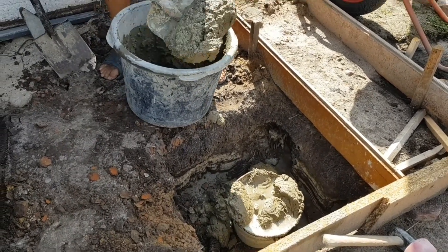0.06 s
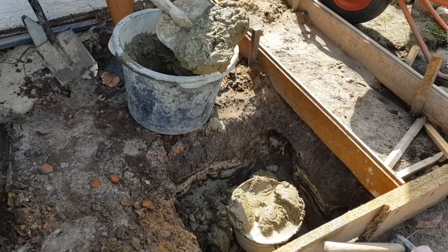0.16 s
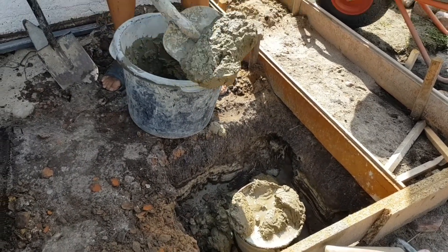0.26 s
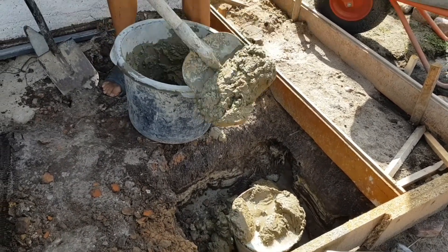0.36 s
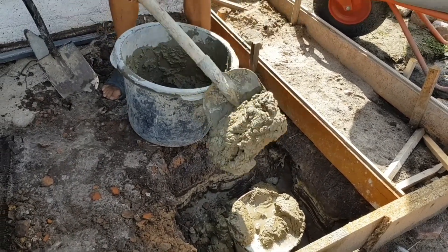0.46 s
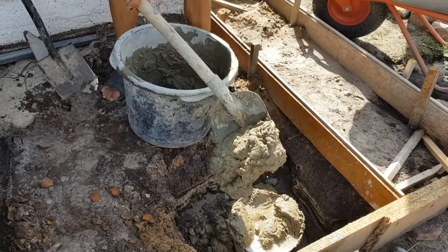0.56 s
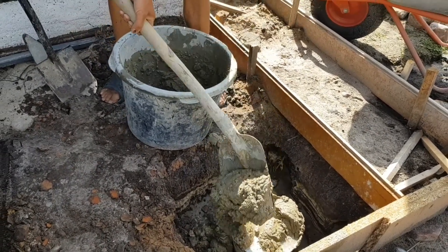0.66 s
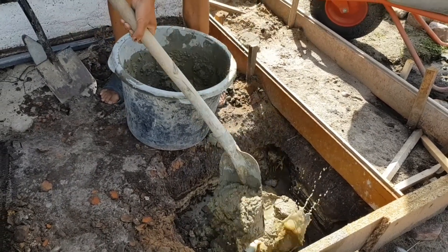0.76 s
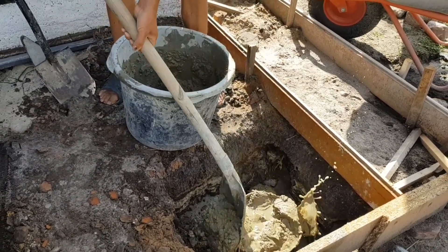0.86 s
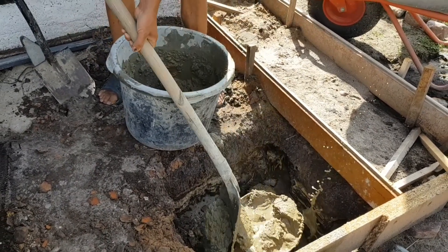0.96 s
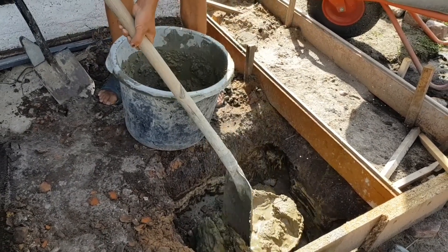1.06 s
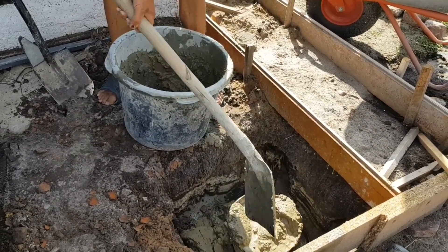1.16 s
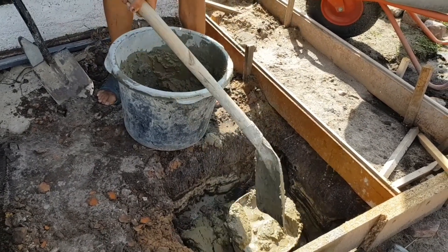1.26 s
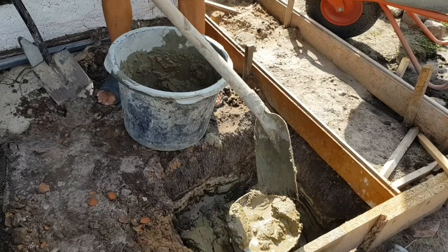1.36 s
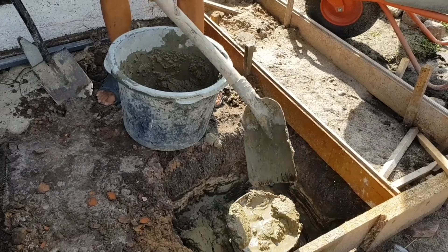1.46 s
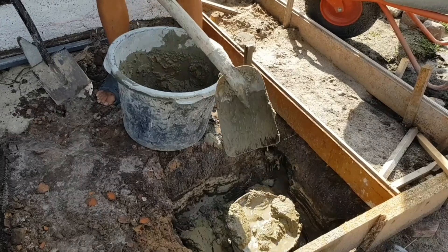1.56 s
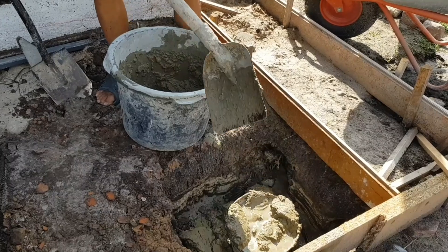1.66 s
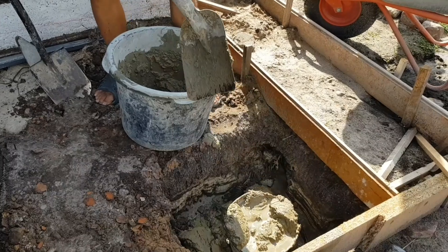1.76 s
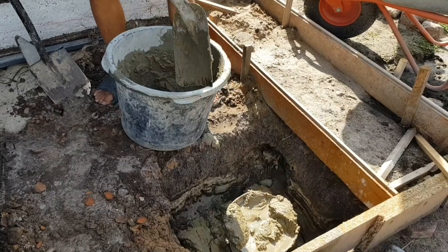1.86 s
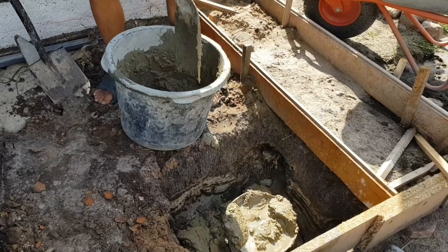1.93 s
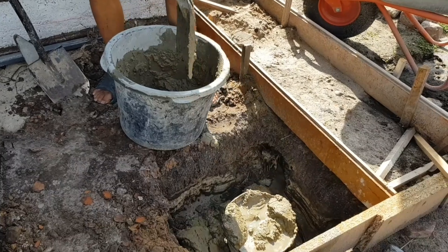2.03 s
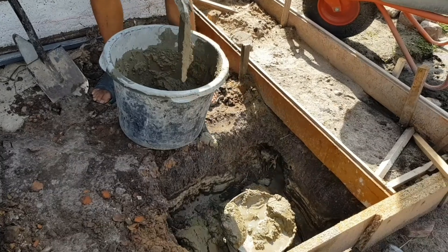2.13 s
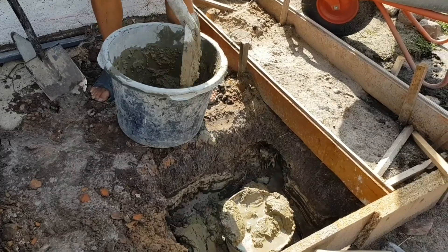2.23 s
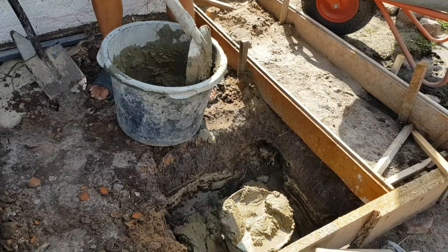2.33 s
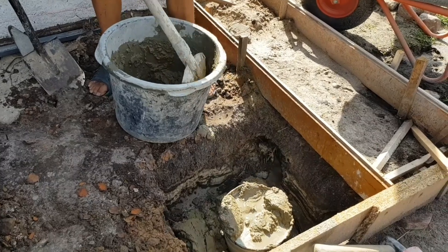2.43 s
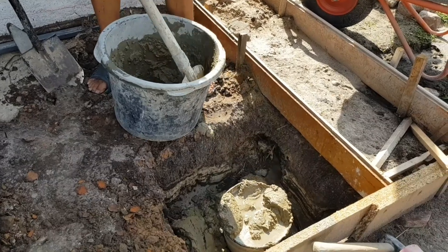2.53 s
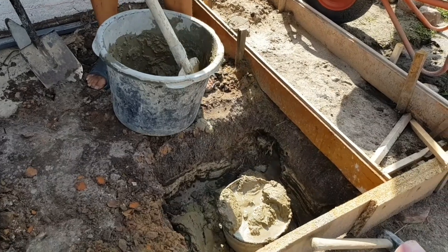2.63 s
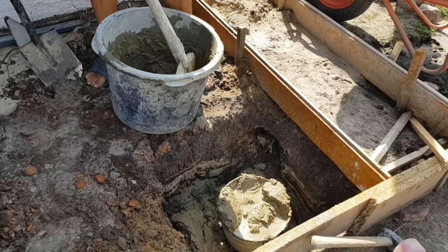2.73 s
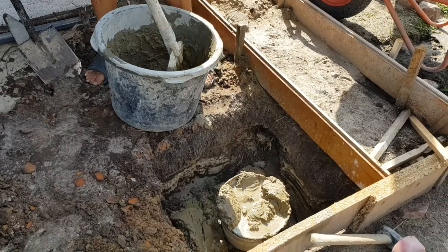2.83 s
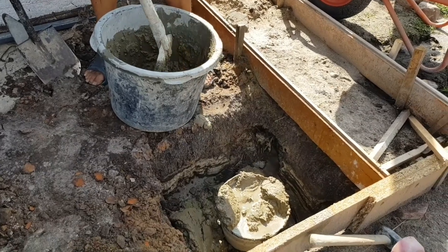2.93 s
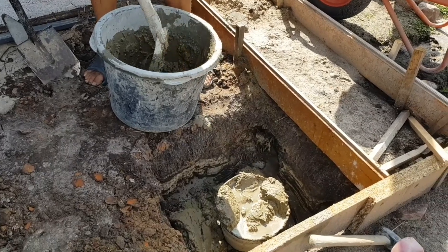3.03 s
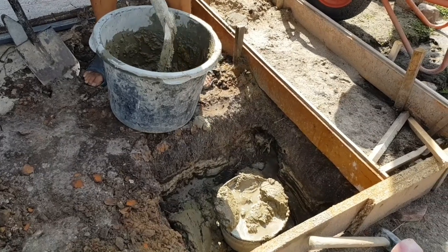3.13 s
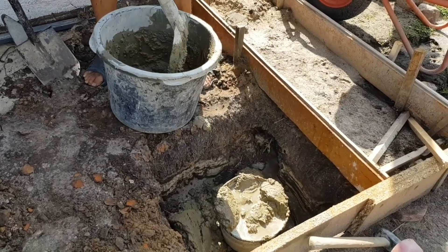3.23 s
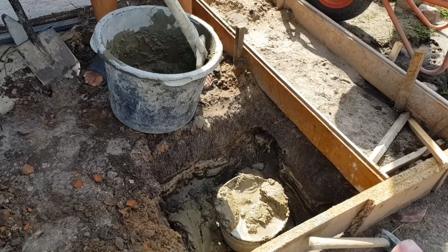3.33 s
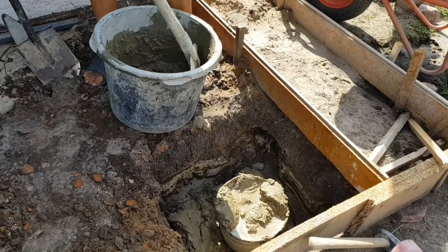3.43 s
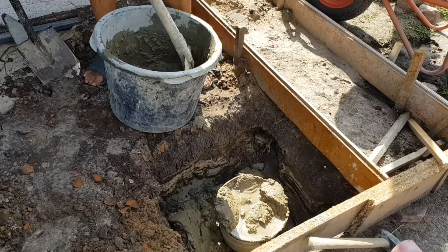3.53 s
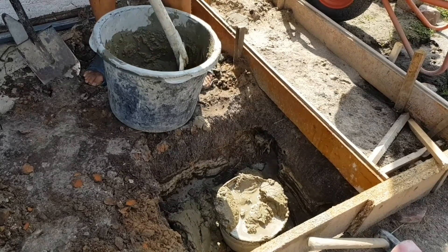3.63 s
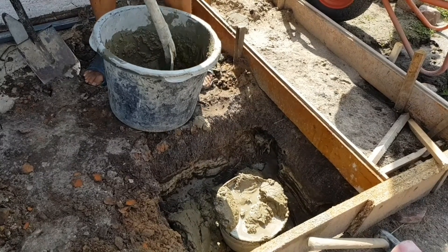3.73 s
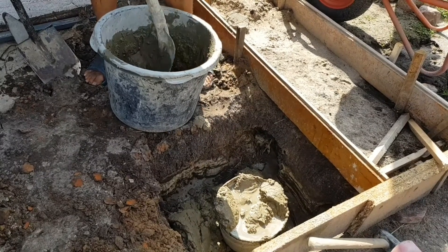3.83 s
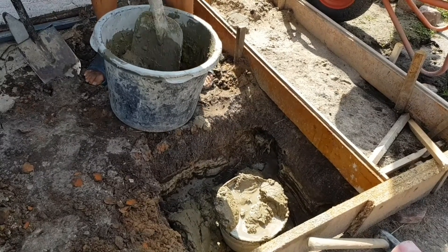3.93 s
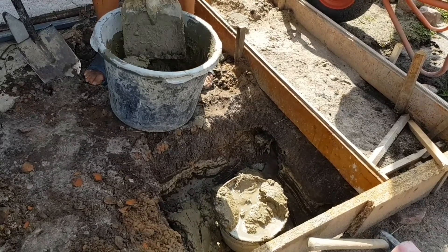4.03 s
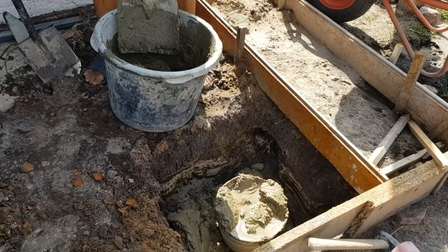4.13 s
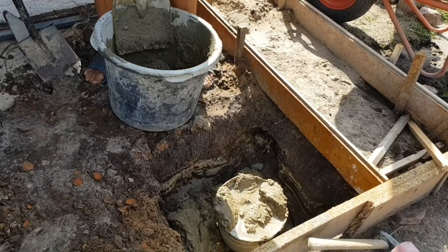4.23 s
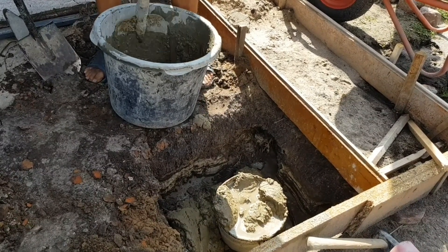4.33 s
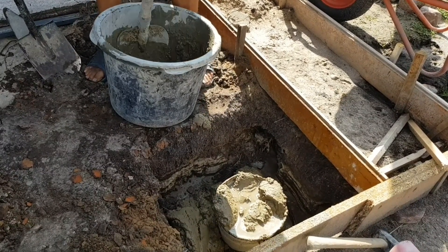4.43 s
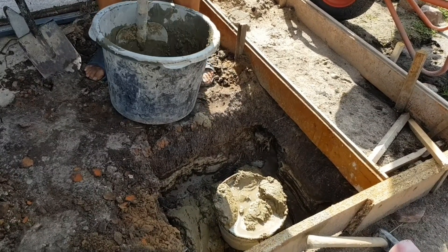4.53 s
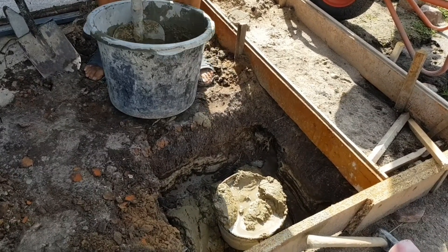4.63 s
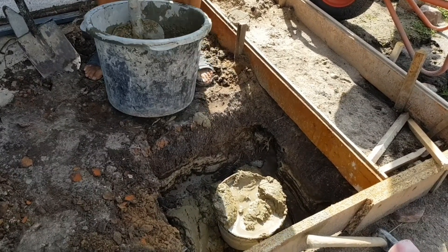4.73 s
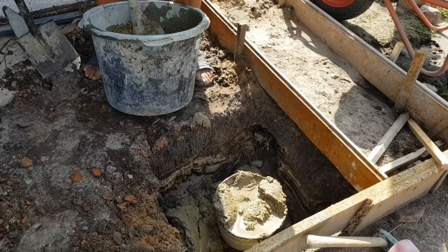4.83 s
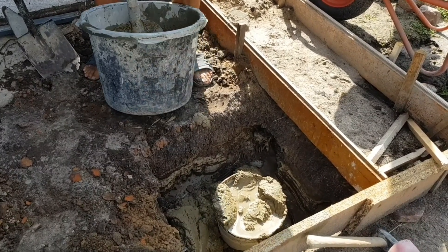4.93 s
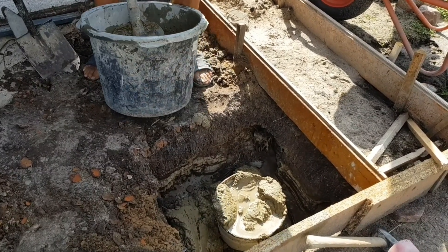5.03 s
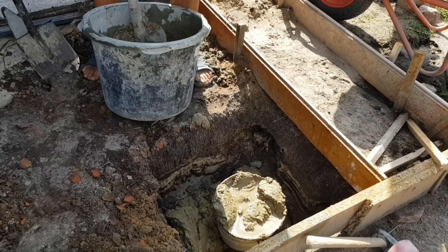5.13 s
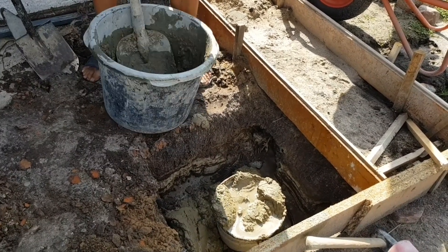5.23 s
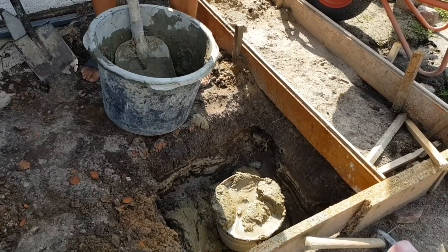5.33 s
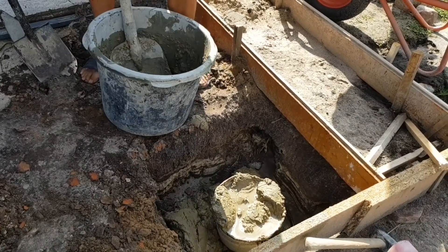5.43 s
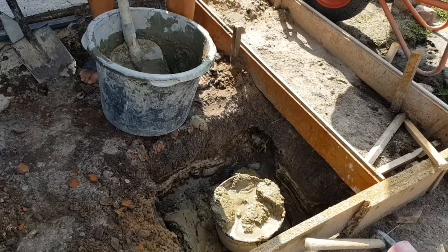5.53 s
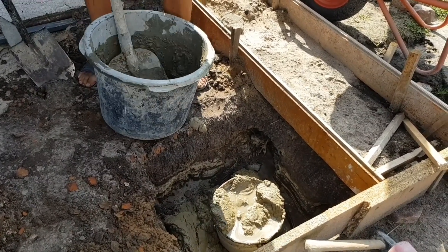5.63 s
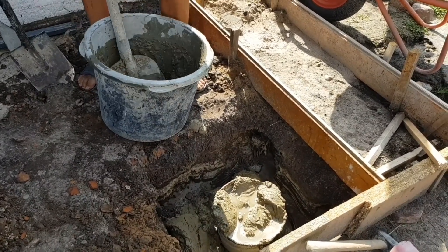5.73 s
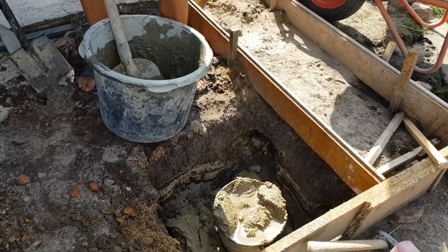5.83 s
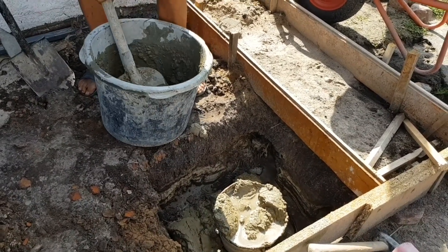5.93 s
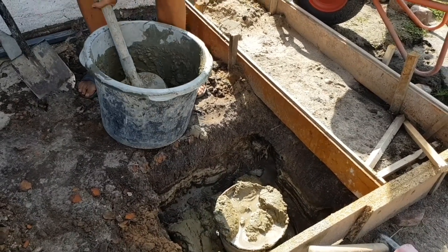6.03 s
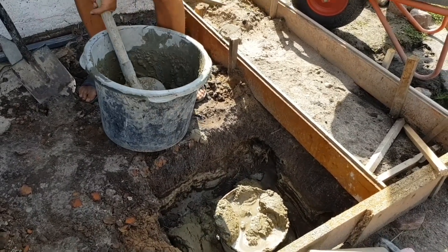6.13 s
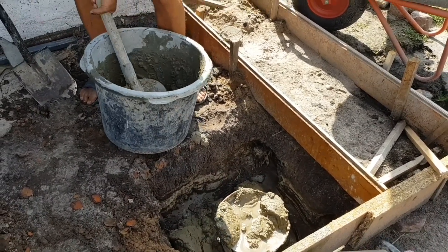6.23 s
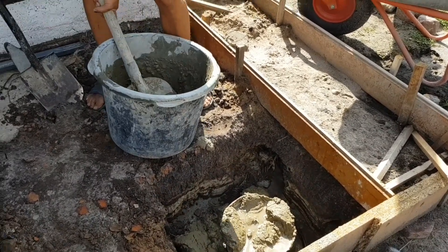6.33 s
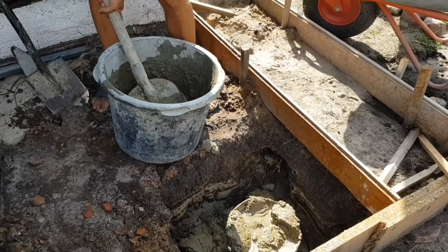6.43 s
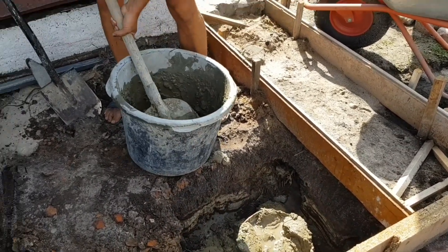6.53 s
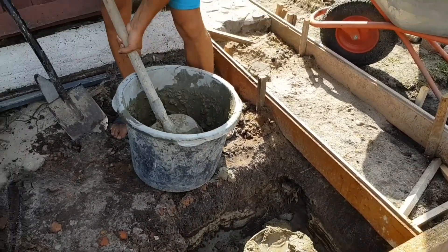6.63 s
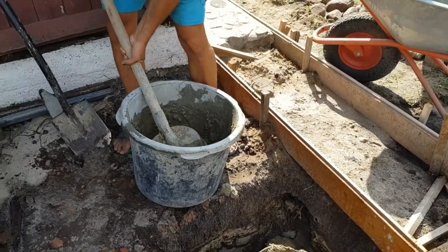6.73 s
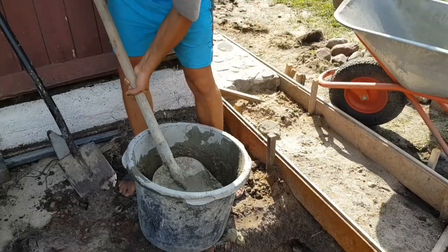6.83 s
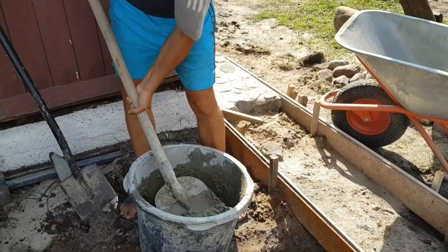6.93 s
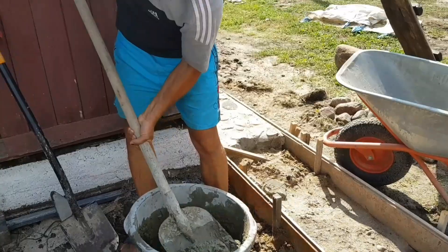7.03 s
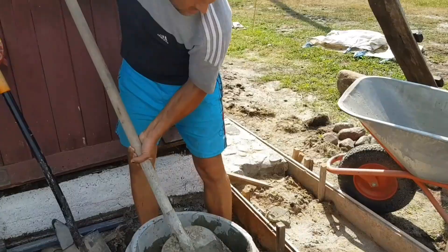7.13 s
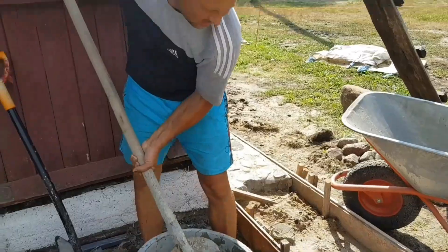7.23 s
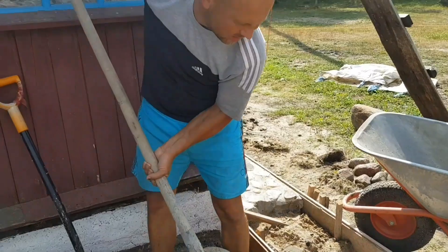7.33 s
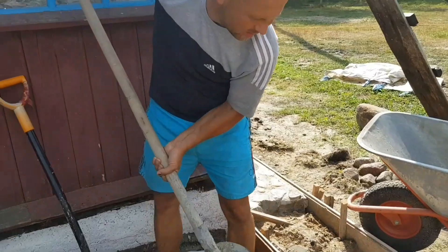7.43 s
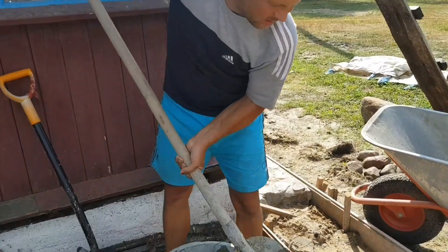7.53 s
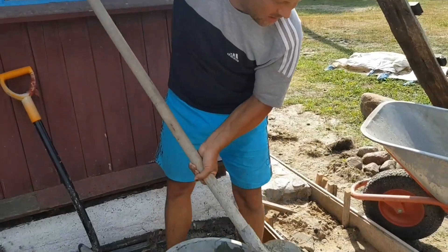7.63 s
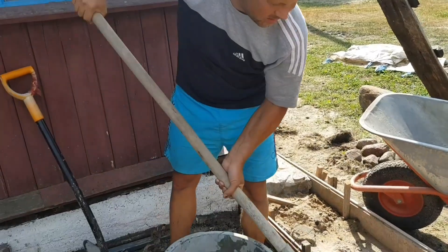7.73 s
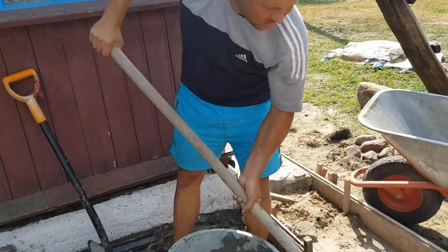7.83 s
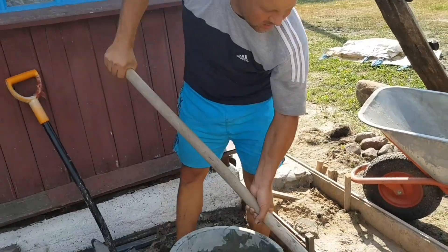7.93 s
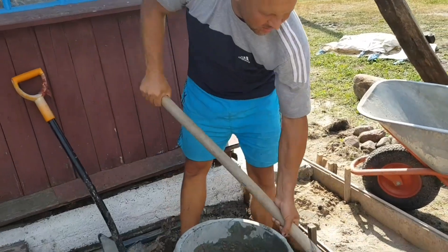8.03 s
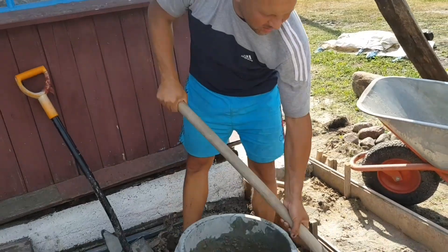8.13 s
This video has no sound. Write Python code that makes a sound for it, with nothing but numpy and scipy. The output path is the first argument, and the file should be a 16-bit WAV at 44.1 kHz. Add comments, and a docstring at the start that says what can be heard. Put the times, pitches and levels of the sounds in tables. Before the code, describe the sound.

Wet concrete slaps down off a shovel, then the blade knocks and scrapes gritty mix in a plastic tub outdoors.

```python
"""Wet concrete crackles and slides on a steel shovel in a yard; then the load slaps into a footing hole.
The blade knocks on a plastic tub and scrapes gritty mortar along its wall, stroke after stroke: impacts
and stick-slip friction excite the modes of steel and plastic. In between, films of cement water burst
softly in the mix. Behind it all lies a distant hush, and a light breeze buffets the microphone."""
import sys
import numpy as np
from scipy import signal
from scipy.fft import rfft, irfft, next_fast_len
from scipy.io import wavfile

SR = 44100
rng = np.random.default_rng(int(sys.argv[2]) if len(sys.argv) > 2 else 0)


def dump(signal):
    """Clip the signal to [-1, 1] and save it as 16-bit WAV at the path in sys.argv[1]."""
    limited = np.clip(np.atleast_2d(signal).T, -1, 1)
    pcm = np.round(limited * 32767).astype(np.int16)
    wavfile.write(sys.argv[1], SR, pcm)


N = 361179

# Spectra of the noises. Each row: frequency in Hz, relative spectral density in dB.
HUSH_SPECTRUM = [(30, -13), (100, -1), (200, -1), (360, 5), (480, -0.5), (700, -10), (1200, -13),
                 (2300, -14.5), (5000, -16), (9000, -19), (14500, -20)]  # distant outdoor sound
GUST_SPECTRUM = [(15, 0.5), (30, -21.5), (52, -0.5), (80, -1), (115, -8), (170, -20.5), (300, -25),
                 (900, -64)]  # wind on the microphone
CRACKLE_SPECTRUM = [(400, -18.5), (1000, -7), (2500, 5), (4200, 3), (5500, 2), (7200, 3.5), (8800, -1),
                    (14500, 1)]  # bursting films of water
SLIDE_SPECTRUM = [(600, -14), (900, -3.5), (1400, -2.5), (1900, 4), (2450, 2), (3100, -2), (4000, 0),
                  (9000, -15)]  # mix sliding on steel
GRAVEL_SPECTRUM = [(150, -45), (350, -4), (520, -5.5), (900, 3), (1300, -11), (1900, -2), (2700, -10),
                   (3300, -22), (6000, -25), (15000, -24.5)]  # grinding gravel
SAND_SPECTRUM = [(500, -16.5), (1500, -3), (2800, 2.5), (3500, 0), (5200, -1.5), (7300, -1.5), (8300, -4),
                 (14500, -3.5)]  # rasping sand

# Normal modes. Each row: frequency in Hz, relative level in dB, time to decay by 60 dB in seconds.
BASE_MODES = [(120, -0.5, 0.12), (195, -5, 0.079)]  # base of the tub
WALL_MODES = [(216, -2.5, 0.074), (241, -3, 0.059), (250, -5, 0.089), (297, -12, 0.057),
              (372.5, -9.5, 0.066), (442, -10.5, 0.056), (480, -8, 0.06), (512, -10.5, 0.065),
              (614, -15, 0.054)]  # plastic wall of the tub
BLADE_MODES = [(619, -4, .05), (840, -5, .04), (892, -3, .09), (1178, 0, .11), (1271, 0, .08),
               (1487, -2, .04), (1577, -1, .1), (1834, 0, .07), (1879, -1, .06), (2047, -4, .05),
               (2246, -4, .06), (2481, -1, .13), (2614, -4, .06), (2793, -4, .05), (3262, -8, .1),
               (4837, -10, .13), (6331, -11, .13), (6728, -12, .12)]  # steel blade damped by mortar

# Course of the distant hush. Each row: time in seconds, relative level in dB.
HUSH_LEVELS = [(0, -60.5), (0.2, -59.5), (0.44, -62), (0.7, -58), (1.35, -61.5), (1.8, -58.5), (2.3, -61),
               (2.75, -57.5), (3.301, -60), (4.15, -59), (5.05, -60.5), (5.7, -57.5), (6.25, -60),
               (6.9, -57.5), (7.45, -66.5), (7.8, -58), (8.19, -63.5)]
# Puffs of breeze. Each row: start and length in seconds, relative level in dB.
BREEZE_PUFFS = [(0.13, 0.079, -42.5), (0.28, 0.028, -49), (0.52, 0.31, -48.5), (1.023, 0.11, -48),
                (2.113, 0.13, -56), (2.39, 0.2, -48), (2.903, 0.25, -44), (3.245, 0.33, -45.5),
                (3.693, 0.45, -48.5), (4.243, .28, -45.5), (4.903, .06, -44.5), (5.28, 0.093, -50.5),
                (6.414, .05, -56), (6.936, 0.068, -40), (7.329, 0.035, -51), (7.724, 0.11, -44),
                (7.94, .06, -43)]
# The wet mix shifts. Each row: start and length in seconds, swell over the shift in dB,
# relative levels of crackle and of sliding in dB.
MIX_SHIFTS = [(0.0, 0.041, 6.5, -62.5, -48.5), (0.29, .012, 5, -61.5, -58), (0.532, 0.33, 0, -53, -54),
              (0.80, 0.17, -2.5, -53.5, -47), (1.048, 0.1, 4.5, -49.5, -45), (1.23, .025, 2, -59, -60),
              (1.43, 0.091, 4, -55.5, -73), (2.676, .12, -5, -69, -55.5), (2.889, .19, 6, -56, -53),
              (3.608, 0.17, -2, -58, -53), (3.895, 0.026, 0, -56.5, -55.5), (3.982, 0.28, -3, -66, -75),
              (4.53, .03, 0, -57, -66), (4.62, .34, 2.5, -59.5, -56.5), (5.38, .09, -2, -58, -70),
              (6.332, 0.28, 13, -60, -58), (6.843, 0.22, 2, -60.5, -59), (7.17, 0.053, -3, -58.5, -61),
              (7.296, 0.094, 1, -60.5, -78), (7.545, 0.017, 0.5, -56.5, -68), (7.772, 0.36, 4.5, -57, -75)]
# Pebbles skid on steel. Each row: start in seconds, level in dB, pitch in Hz, length in seconds.
PEBBLE_SKIDS = [(0.0, -52.5, 2520, 0.067), (0.779, -42, 2600, 0.017), (1.023, -54, 1900, 0.027),
                (1.063, -43, 1960, 0.019), (3.498, -30.5, 2400, 0.024), (6.915, -60, 2400, .17),
                (6.97, -56.5, 860, .08), (7.15, -55, 2530, .065), (7.535, -51.5, 2730, 0.039),
                (7.729, -59.5, 2500, .17), (7.84, -57.5, 2820, 0.16)]
# The loaded tub bumps on the soil. Each row: start in seconds, impulse level in dB.
TUB_BUMPS = [(3.173, -37), (3.53, -34), (5.664, -43), (6.040, -41), (6.585, -24.5), (6.593, -26),
             (6.934, -34.5)]
# Lumps and pebbles land. Each row: start in seconds, slap level in dB, pitch in Hz, crack level in dB.
LUMP_LANDINGS = [(0.7794, -33.5, 1860, -27.5), (0.783, -39, 196, -45), (0.795, -44, 1670, -40),
                 (0.836, -44.5, 1390, -46), (0.892, -39, 1280, -36), (0.901, -32, 410, -27.5),
                 (0.904, -39.5, 1410, -49), (1.106, -41.5, 950, -33.5), (1.121, -34.5, 530, -36.5),
                 (1.148, -34, 495, -46)]
# Blade and stones strike the tub. Each row: start in seconds, clack level in dB, pitch in Hz,
# crack level in dB, relative level of the wall's thump in dB.
BLADE_KNOCKS = [(1.9263, -32, 786, -35, -32.5), (2.403, -39, 1800, -42, -53), (2.4240, -13, 1580, -34, -31),
                (2.4262, -13, 1300, -37, -46), (2.433, -25, 230, -44, -20.5), (2.488, -24, 1410, -27, -30),
                (2.547, -23.5, 1500, -47, -30), (2.586, -46, 377, -53, -28.5),
                (3.168, -42, 457, -40, -38.5), (3.505, -33, 1400, -37, -52), (3.528, -23.5, 470, -37, -27),
                (4.13, -53, 300, -60, -44), (4.2644, -38.5, 470, -56, -37), (4.330, -31, 850, -36, -26),
                (4.395, -29, 1000, -22.5, -30), (4.446, -21, 1210, -37, -36), (4.473, -48, 350, -35, -28.5),
                (5.255, -33.5, 533, -45, -48), (5.481, -38.5, 1080, -49, -50), (5.612, -42, 1270, -53, -45),
                (6.040, -36.5, 390, -59, -36), (6.4123, -42, 640, -48, -46), (6.580, -22.5, 450, -55, -30),
                (6.592, -44, 400, -58, -25), (6.785, -46.5, 810, -55, -66)]
# The blade is pushed along the tub. Each row: start and length in seconds, swell over the stroke in dB,
# relative levels of grinding, of drag on the wall and of sand rasp in dB.
BLADE_STROKES = [(1.935, 0.0049, -11, -40, -41.5, -48.5), (2.419, .16, -1, -32.5, -37.5, -34),
                 (3.411, 0.049, 1, -38, -40.5, -37.5), (3.512, 0.016, -4.5, -36.5, -47, -39),
                 (4.275, 0.031, 6.5, -35.5, -39.5, -40.5), (4.327, 0.13, 4.5, -27.5, -43, -31),
                 (4.814, 0.037, 3, -48.5, -53, -62), (5.16, 0.12, 4.5, -41.5, -51, -47.5),
                 (5.27, 0.056, -2, -32.5, -36, -39), (5.341, 0.044, -6, -38.5, -40, -49),
                 (5.484, 0.032, -0.5, -51.5, -47.5, -56), (5.616, .02, 3, -40, -41.5, -50.5),
                 (5.662, 0.17, -10, -49.5, -45.5, -56), (5.859, 0.2, 11.5, -45, -44, -53.5),
                 (6.16, .015, -3, -60, -56, -65), (6.416, 0.034, -4, -54.5, -55, -59),
                 (6.588, 0.06, -4, -46, -39, -56), (6.772, 0.019, 0.5, -46.5, -44, -50.5),
                 (6.943, .08, -1, -61, -53.5, -59), (7.190, .02, -6, -57.5, -71, -59),
                 (8.186, .05, 1, -50, -70, -48.5)]


def from_db(db):
    """Amplitude grows tenfold for every 20 dB."""
    return np.exp(np.asarray(db) * (np.log(10) / 20))


def rms_one(x):
    """Division by the root mean square gives a signal unit power."""
    return x / np.sqrt(np.mean(x ** 2) + 1e-20)


def add(out, start, sound):
    """Superposition: a short sound adds to the mix from its start in seconds."""
    part = out[..., int(start * SR):][..., :sound.shape[-1]]
    part += sound[..., :part.shape[-1]]


def cut(x, hz, kind, order=2):
    """A Butterworth low- or high-pass slopes by 6 dB per octave for each order."""
    return signal.sosfilt(signal.butter(order, min(hz, SR / 2.2), kind, fs=SR, output="sos"), x + 1e-18)


def drift(hz):
    """Low-passed noise wanders at random with unit power, faster for a higher corner frequency."""
    pole = np.exp(-80 * np.pi * hz / SR)  # one step per 40 samples
    slow = signal.lfilter([1], [1, -2 * pole, pole * pole], rng.standard_normal(N // 40 + 2002))[2000:]
    return np.interp(np.arange(N) / 40, np.arange(len(slow)), rms_one(slow))


def coloured(x, spectrum):
    """A minimum-phase filter imposes a spectrum causally; the result has unit power."""
    size = 2 * next_fast_len(N // 2 + SR // 10)
    hz, db = np.transpose(spectrum)
    shape_db = np.interp(np.log(np.arange(size // 2 + 1) * SR / size + 1), np.log(hz), db)
    cepstrum = irfft(np.log(from_db(shape_db)))[:size // 2]
    response = np.exp(rfft(2 * cepstrum, size))
    return rms_one(irfft(rfft(x, size) * response)[..., :N])


def swells(start, length, level_db, swell_db, rise, fall):
    """Envelopes rise and fall exponentially (dB/s), ramping by swell_db between; the loudest prevails."""
    t = np.arange(0, N + 40, 40) / SR
    since, length = t[:, None] - start, np.maximum(length, 1e-3)
    held_db = level_db + swell_db * (np.clip(since / length, 0, 1) - .5)
    db = held_db + rise * np.minimum(since, 0) - fall * np.maximum(since - length, 0)
    return np.interp(np.arange(N) / SR, t, from_db(db.max(axis=1)))


def ring(force, modes):
    """Modal superposition: a force drives damped resonators, which sum with alternating signs."""
    out = 0
    for k, (hz, db, t60) in enumerate(modes):
        radius, angle = from_db(-60 / (t60 * SR)), 2 * np.pi * hz / SR
        feedback = [1, -2 * radius * np.cos(angle), radius * radius]
        out = out + (-1) ** k * from_db(db) * signal.lfilter([0, np.sin(angle)], feedback, force + 1e-18)
    return out


def rubbed(force, modes, wander_db):
    """Coupling to each mode varies as the contact point travels; the result has unit power."""
    return rms_one(sum((-1) ** k * ring(force * from_db(wander_db * drift(hz=10.2)), [mode])
                       for k, mode in enumerate(modes)))


def grains(per_s, spread_db, size=N):
    """Shot noise: many small clicks and a few large; the channels share lows but differ in the treble."""
    born = rng.random((3, size)) < per_s / SR
    clicks, count = np.zeros((3, size)), born.sum()
    signs = rng.choice([-1, 1], count)
    clicks[born] = signs * from_db(spread_db * np.minimum(rng.exponential(1, count), 4))
    shared = cut(clicks[0], 930, "low", order=1)
    return rms_one(shared + cut(clicks[1:], 2040, "high", order=1))


def burst(source, t60, rise):
    """A transient builds with time constant rise, then decays exponentially, 60 dB in t60 seconds."""
    t = np.arange(source.shape[-1]) / SR
    return rms_one(source) * (1 - np.exp(-t / rise)) * from_db(-60 * t / t60)


def impact(level_db, hz, octaves, t60, crack_db):
    """A granular impact is a rattle of contacts in one band, topped by a crack and a spray of grit."""
    contacts, grit = (grains(per_s=11000, spread_db=3.5, size=SR // 4) for _ in range(2))
    low_hz, high_hz = hz / 2 ** (octaves / 2), hz * 2 ** (octaves / 2)
    band = cut(cut(contacts, high_hz, "low", order=4), low_hz, "high", order=3)
    body = burst(band, t60, rise=0.00028)
    grit = cut(cut(grit, 1500, "high"), 8800, "low", order=1)
    crack = burst(grit, t60=0.015, rise=0.00094)
    spray = from_db(-2.5) * burst(grit, t60=0.085, rise=0.0039)
    return from_db(level_db) * body + from_db(crack_db) * (crack + spray)


def air():
    """Turbulent pressure rumbles on the microphone over a distant hush, decorrelated in the treble."""
    shared, apart = rng.standard_normal((2, N)), rng.standard_normal((2, 2, N))
    hush = coloured(shared[0] + from_db(10) * cut(apart[0], 1230, "high", order=1), HUSH_SPECTRUM)
    hush_db = np.interp(np.arange(N) / SR, *np.transpose(HUSH_LEVELS))
    rumble = coloured(shared[1] + from_db(4) * apart[1], GUST_SPECTRUM) * from_db(3.95 * drift(hz=10.8))
    puffs = swells(*np.transpose(BREEZE_PUFFS), swell_db=0, rise=500, fall=303)
    calm, balance = from_db(-63.5), from_db([[2.5], [-2.5]])
    return from_db(4.5 + hush_db) * hush + (calm + puffs) * rumble * balance


def house_echo(x, t60):
    """Reflections from the house wall and the yard merge into a dull, exponentially decaying tail."""
    t = np.arange(SR // 2) / SR
    tail = rng.standard_normal((2, len(t))) * from_db(-60 * t / t60) * (t > .006)
    tail /= np.linalg.norm(tail, axis=1, keepdims=True)
    return signal.fftconvolve(cut(x, 3400, "low", order=1), tail, axes=1)[:, :N]


def yard(x):
    """Direct sound reaches the left channel a moment before the right; weak reflections follow."""
    direct = np.array([x[0], np.roll(x[1], 3)])
    return direct + from_db(-15.5) * house_echo(x, t60=0.23)


def stones(per_s, spread_db, t60):
    """Free vibration: each stone clinks as a damped sinusoid with its own pitch and stereo position."""
    out, t = np.zeros((2, N)), np.arange(SR // 20) / SR
    for when, pitch, size, side, polarity in rng.random((int(per_s * N / SR), 5)):
        hz = 480 * 20 ** pitch
        envelope = from_db(spread_db * min(-np.log(1 - size), 3) - 60 * t / t60)
        pan = np.sqrt([[side], [1 - side]])
        add(out, when * N / SR, pan * np.sign(polarity - .5) * envelope * np.sin(2 * np.pi * hz * t))
    return rms_one(out)


def wet_mix(clinks):
    """Films of cement water rupture as the mix moves; sand and pebbles slide with friction on the blade."""
    start, length, swell_db, *levels = np.transpose(MIX_SHIFTS)
    parting, sliding = (swells(start, length, db, swell_db, rise=118, fall=200) for db in levels)
    crackle = coloured(grains(per_s=5000, spread_db=2.5), CRACKLE_SPECTRUM)
    steel = coloured(grains(per_s=2300, spread_db=3.5) + from_db(-0.5) * clinks, SLIDE_SPECTRUM)
    return from_db(4.5) * parting * crackle + from_db(-6.0) * sliding * steel


def skids():
    """Stick-slip of a pebble excites one narrow region of the blade's modes, giving a short zing."""
    out = np.zeros((2, N))
    width = 0.19  # bandwidth as a share of the pitch
    for start, level_db, hz, length in PEBBLE_SKIDS:
        band = signal.butter(2, [hz * (1 - width / 2), hz * (1 + width / 2)], "band", fs=SR, output="sos")
        slips = grains(per_s=4300, spread_db=4.5, size=SR // 4)
        zing = signal.sosfilt(band, slips)[:, :int(length * SR)]
        add(out, start, from_db(level_db) * rms_one(zing) * signal.windows.tukey(zing.shape[1], .5))
    return out


def bumps():
    """Impulses from the ground excite the low modes of the tub's heavy base, which thuds."""
    pushes = np.zeros(N)
    for start, level_db in TUB_BUMPS:
        add(pushes, start, from_db([level_db]))
    return ring(pushes, BASE_MODES)


def splats():
    """Inelastic impact: each lump lands with a wet crack and a slap, lower for a bigger lump."""
    out = np.zeros((2, N))
    for start, slap_db, hz, crack_db in LUMP_LANDINGS:
        add(out, start, impact(slap_db, hz, octaves=1.44, t60=0.11, crack_db=crack_db))
    return out


def knocks():
    """Impact excitation: the blade clacks, more briefly the harder it hits; the compliant wall booms."""
    clacks, pushes = np.zeros((2, N)), np.zeros(N)
    light_t60, hard_db = 0.11, -24  # a knock at hard_db rattles half as long as a very light one
    for start, clack_db, hz, crack_db, thump_db in BLADE_KNOCKS:
        t60 = light_t60 / (1 + from_db(clack_db - hard_db))
        add(clacks, start, impact(clack_db, hz, octaves=1.23, t60=t60, crack_db=crack_db))
        add(pushes, start, from_db([thump_db]))
    steel = from_db(-51.0) * ring(clacks[0], BLADE_MODES)
    boom = from_db(3.5) * ring(cut(pushes, 490, "low"), WALL_MODES)
    return clacks + steel + boom


def scraping(clinks):
    """Stick-slip friction of gravel drives the modes of blade and tub; crushed sand adds a bright rasp."""
    start, length, swell_db, grind_db, drag_db, sand_db = np.transpose(BLADE_STROKES)
    firm_db, sand_speed = -36, 0.79  # loose sand lags the blade
    speed = from_db(0.22 * (grind_db - firm_db))  # lighter strokes move more slowly
    bite, lift = 643 * speed, 507 * speed  # rise and fall in dB/s
    grind_gain = swells(start, length, grind_db, swell_db, bite, lift)
    drag_gain = swells(start, length, drag_db, 0.84 * swell_db, bite, lift)
    rasp_gain = swells(start, length, sand_db, 0.86 * swell_db, sand_speed * bite, sand_speed * lift)

    slip = drift(hz=290)
    gravel = grains(per_s=1600, spread_db=4.0) * from_db(2.0 * slip)
    sand = grains(per_s=6000, spread_db=2.0) * from_db(0.37 * slip)
    rattle = rms_one(cut(cut(clinks, 2620, "low", order=3), 590, "high"))
    steel = rubbed(gravel, BLADE_MODES, wander_db=3.5)
    crunch = from_db(-6.0) * (coloured(gravel, GRAVEL_SPECTRUM) + steel) + from_db(-7) * rattle
    wall = from_db(-1) * rubbed(cut(gravel[0], 188, "high", order=3), WALL_MODES, wander_db=2.0)
    rasp = from_db(3.5) * coloured(sand + from_db(-5.0) * clinks, SAND_SPECTRUM)
    return grind_gain * crunch + drag_gain * wall + rasp_gain * rasp


def scene():
    """The sounds of the shovel work superpose, reflect in the yard and join the hush and the breeze."""
    clinks = stones(per_s=700, spread_db=3.0, t60=0.061)
    work = scraping(clinks) + wet_mix(clinks) + knocks() + bumps() + splats() + skids()
    return yard(work) + air()


def record(dry):
    """Band limiting: a steep elliptic low-pass removes the highest treble."""
    cutoff_hz = 14600
    return signal.sosfilt(signal.ellip(12, .1, 80, cutoff_hz, fs=SR, output="sos"), dry)


dry = scene()
out = record(dry)
dump(out)
```